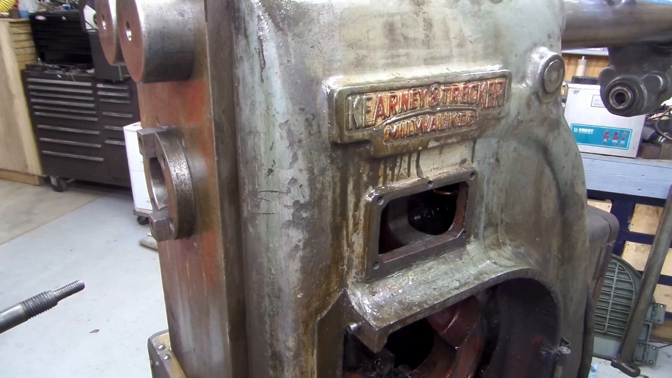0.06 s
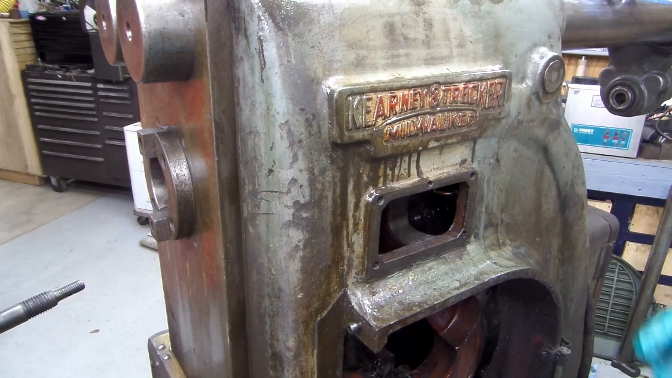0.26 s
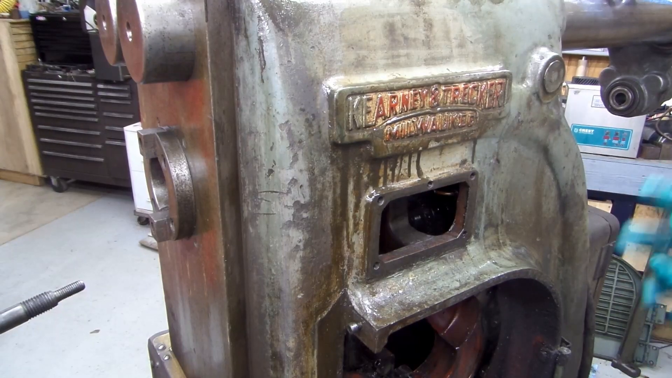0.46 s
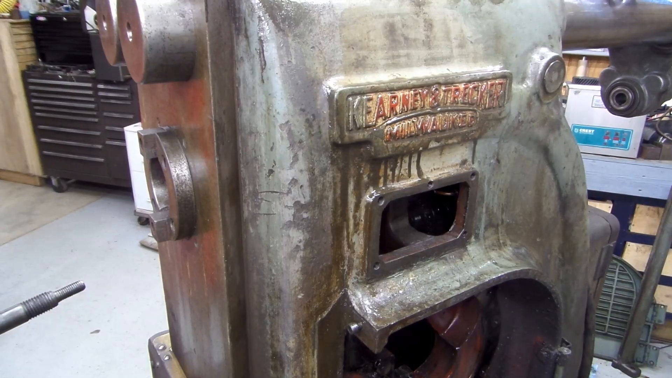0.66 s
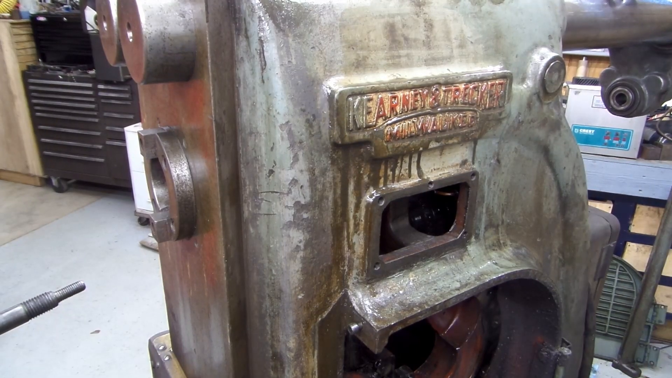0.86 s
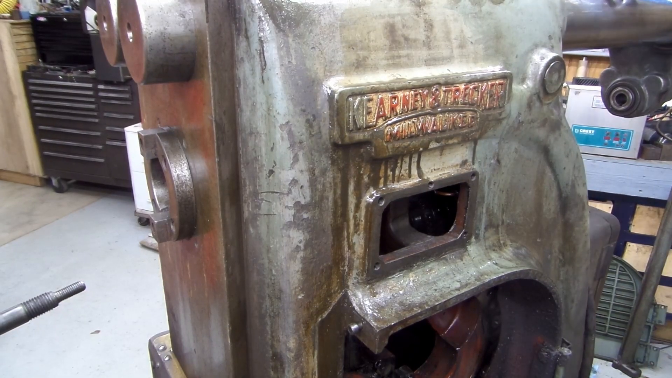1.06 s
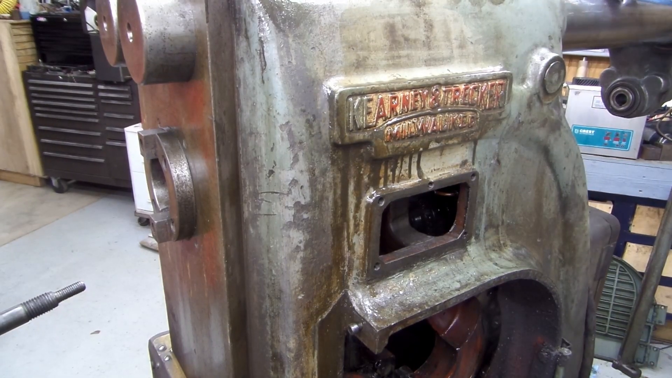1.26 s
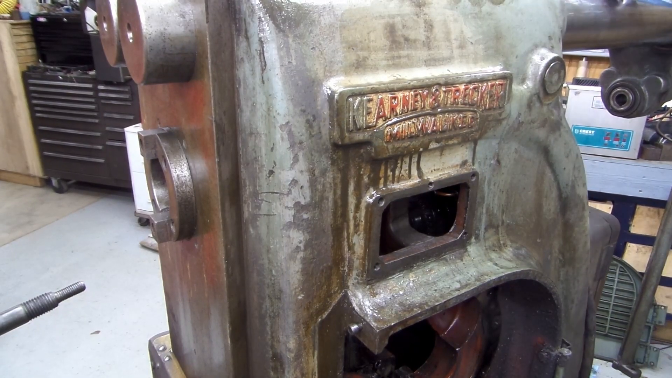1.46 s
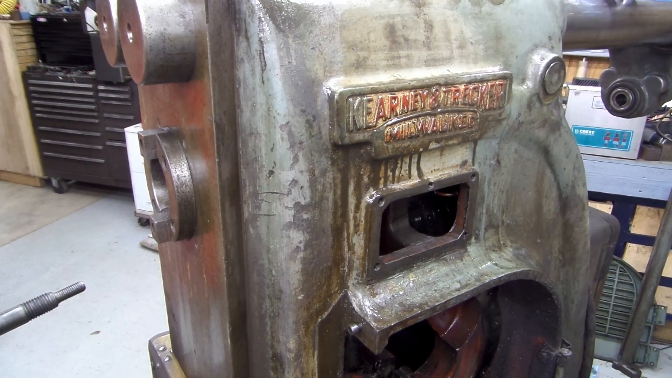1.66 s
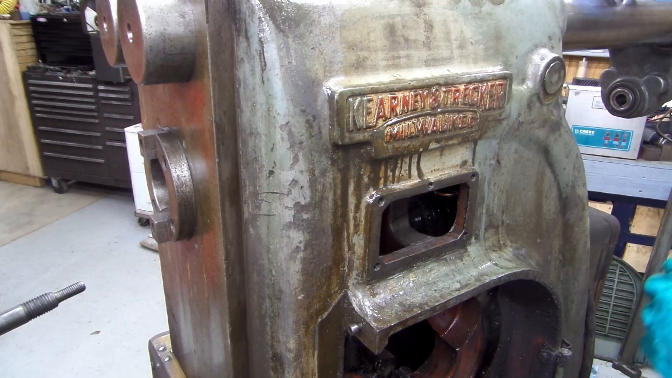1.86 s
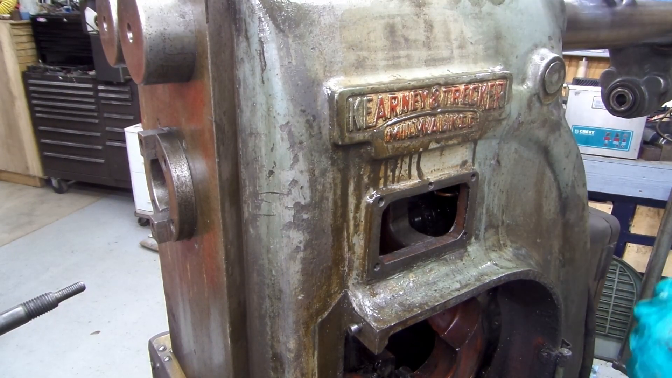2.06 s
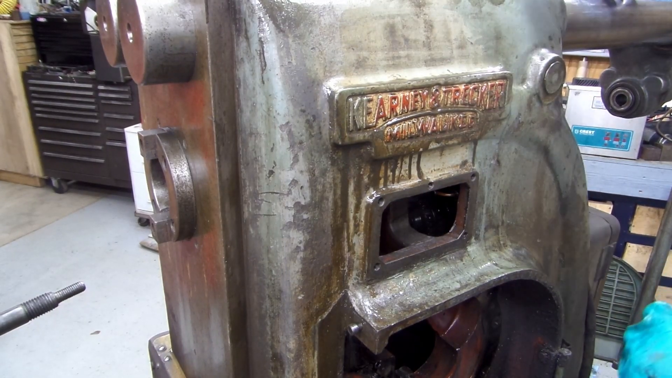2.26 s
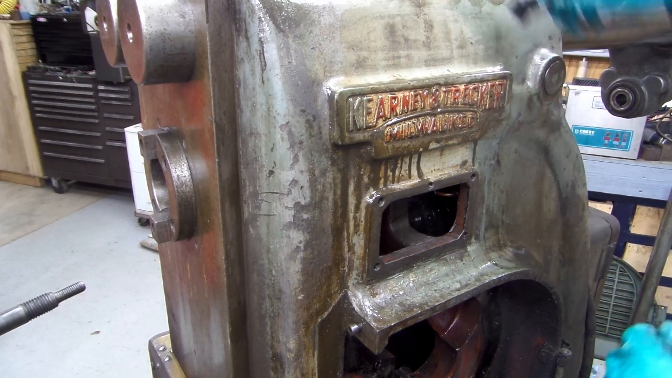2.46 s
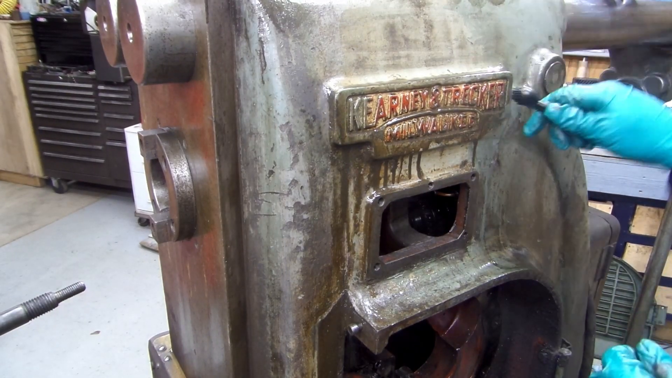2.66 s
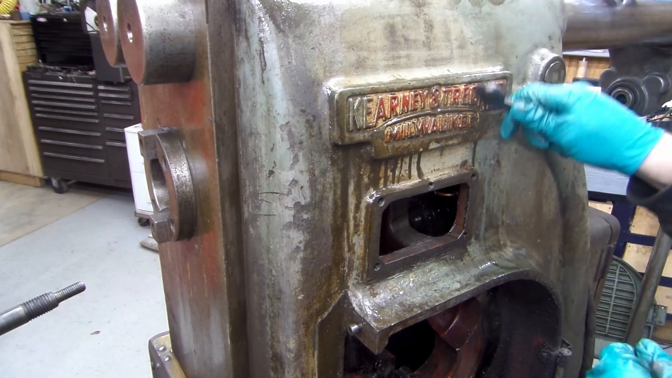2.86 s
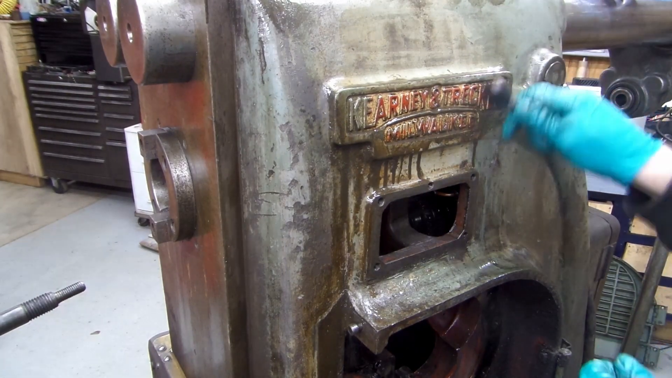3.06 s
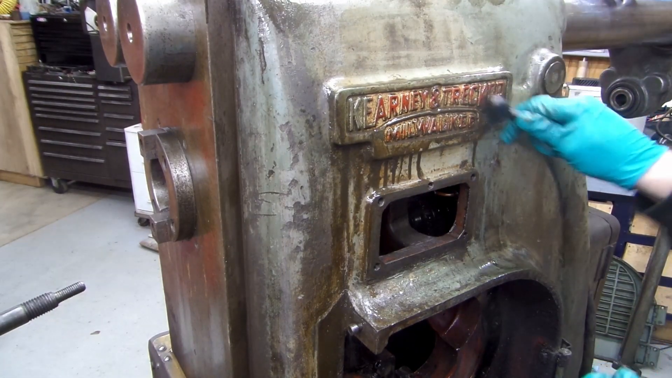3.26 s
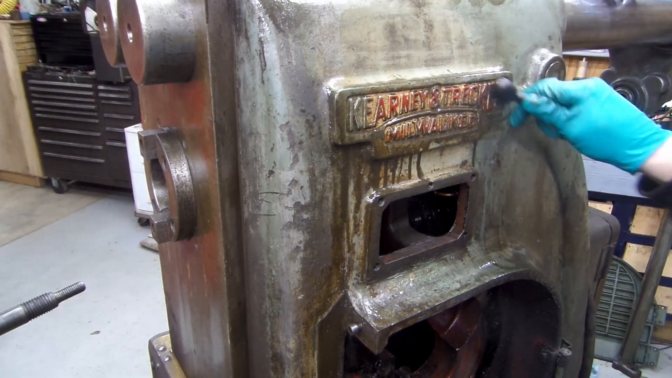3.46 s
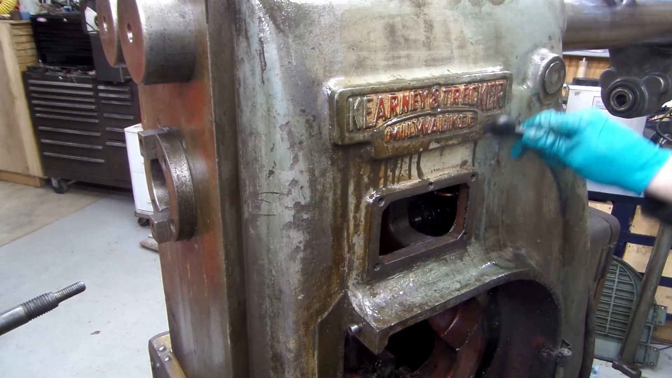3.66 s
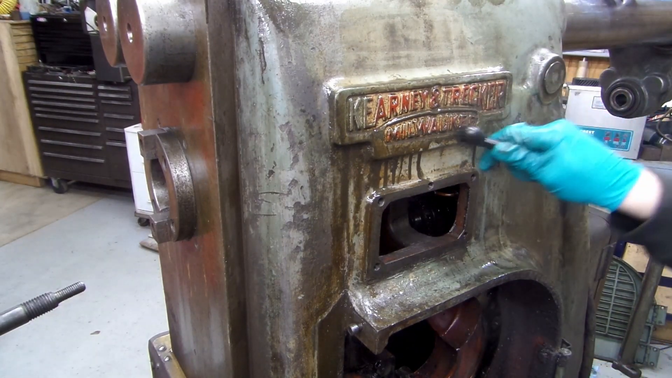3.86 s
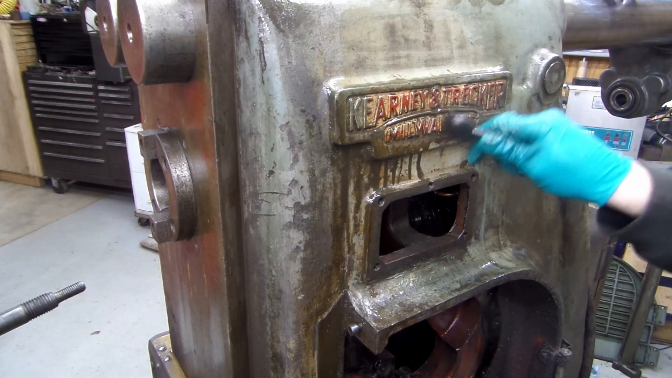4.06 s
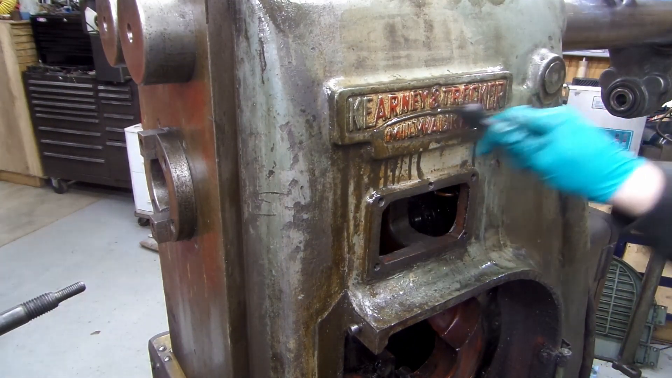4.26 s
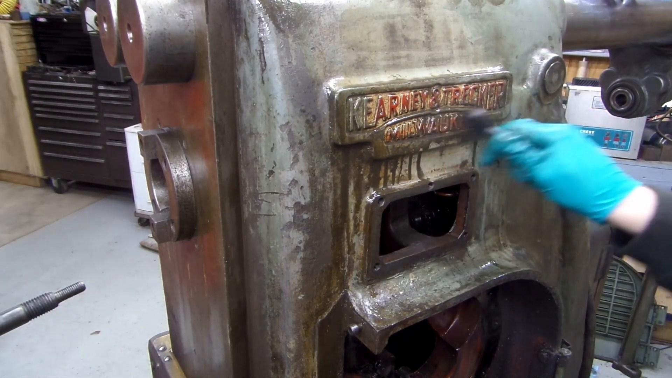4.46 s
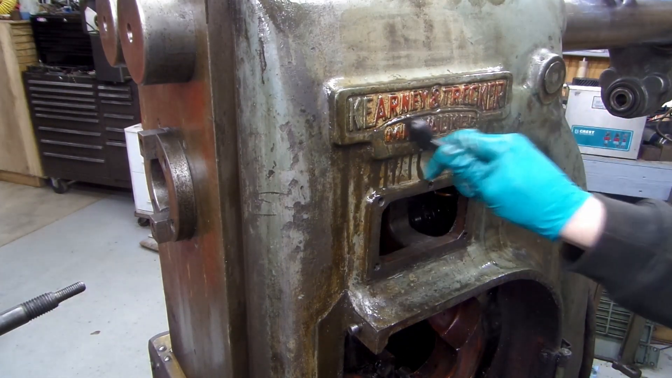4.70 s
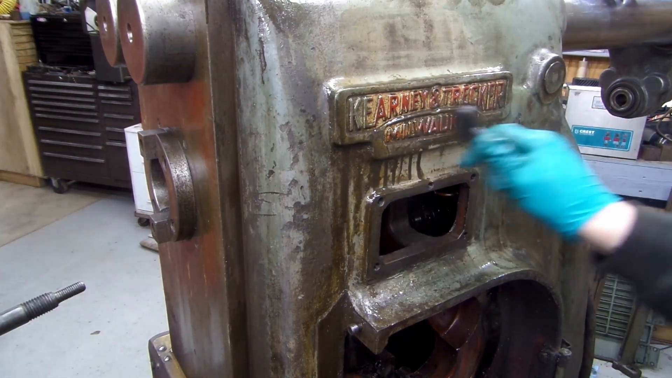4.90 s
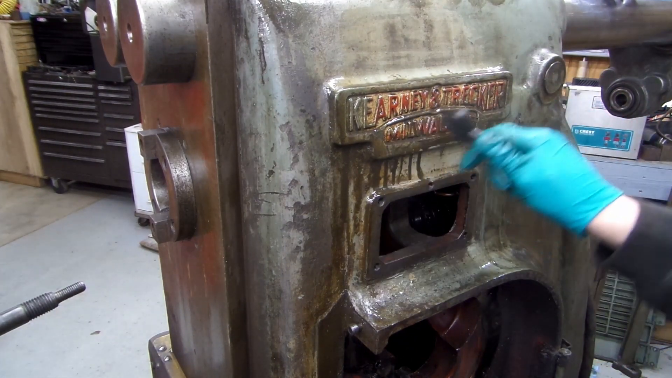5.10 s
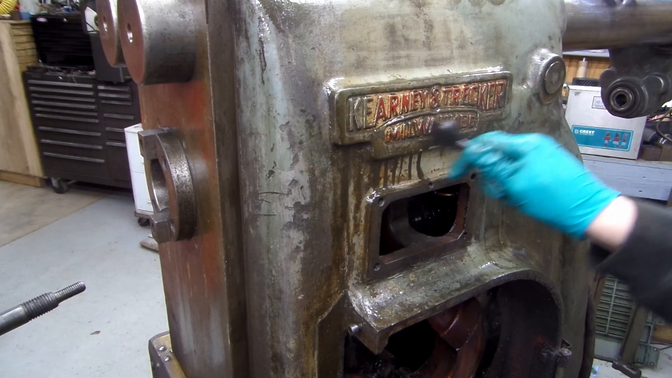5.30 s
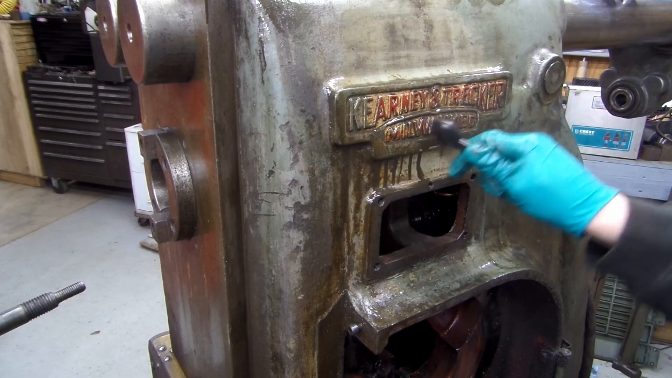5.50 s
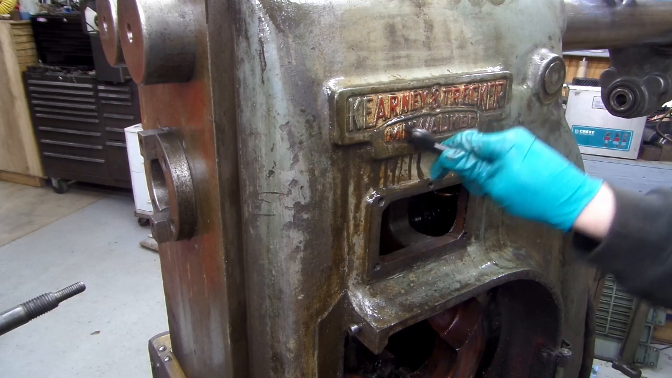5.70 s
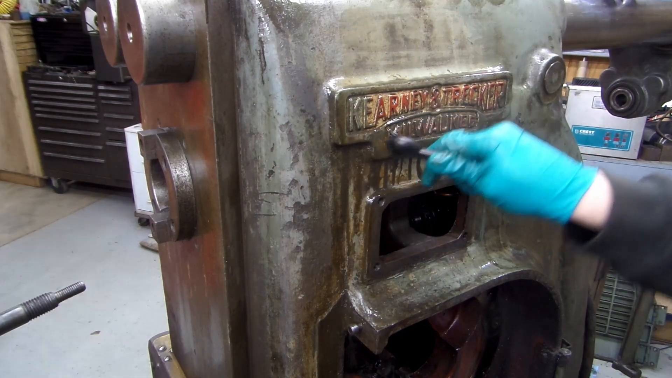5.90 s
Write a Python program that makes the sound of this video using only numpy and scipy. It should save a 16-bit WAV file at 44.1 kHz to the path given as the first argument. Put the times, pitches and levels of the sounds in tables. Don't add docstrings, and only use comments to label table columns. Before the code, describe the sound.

For almost three seconds there is only a thin hiss, low drone and faint brushing, slightly stronger just before one second. Then stiff bristles scrub back and forth on rough metal, about seven or eight strokes a second, crisp and sizzling with tiny snaps. A woody knock interrupts once; later strokes are louder and fuller. Close pickup in a modestly reverberant workshop, lightly lossy.

```python
import sys
import numpy as np
from scipy import signal
from scipy.fft import rfft, irfft, next_fast_len
from scipy.io import wavfile
from scipy.ndimage import uniform_filter1d

SR = 44100
rng = np.random.default_rng(int(sys.argv[2]) if len(sys.argv) > 2 else 0)


def dump_mix(stems):
    frames = np.atleast_2d(stems).T
    limited = np.clip(frames, -1, 1)
    pcm = np.round(limited * 32767).astype(np.int16)
    wavfile.write(sys.argv[1], SR, pcm)


def invert_db(x):
    u = np.asarray(x, float) / 20
    return 10 ** u


N = 261807

# frequency in Hz, density in dB per Hz.
RUMBLE_SPECTRUM = [(59, -38), (100, -5.5), (150, -5), (348, -4.5), (679, -3.5), (735, -3), (1200, -7.5),
                   (1500, -6.5), (1950, -35), (3300, -120)]
# frequency in Hz, density in dB per Hz.
DRONE_SPECTRUM = [(15, -32), (25, -8), (32, -20), (65, -6), (110, -10.5), (140, -61), (240, -120)]
# frequency in Hz, density in dB per Hz.
AIR_SPECTRUM = [(530, -35), (900, -17.5), (1760, -9), (2080, -10.5), (2800, -15), (15700, -17.5)]
# time in seconds, pitch in Hz, level in dB.
PANEL_HUM = [
    (0.42, 175.5, -97),
    (0.452, 170, -72),
    (0.564, 166.3, -68),
    (0.662, 171.3, -61),
    (0.73, 164.7, -72),
    (0.832, 164, -64.5),
    (0.9, 165.5, -88),
]
# time in seconds, effort in dB below full scrubbing.
HAND_WORK = [(0, -16), (.12, -18), (.4, -11), (.7, -3), (.88, -0.5), (1.15, -14.5), (1.7, -19.5),
             (1.85, -14), (2.18, -14), (2.3, -6.5), (2.6, -14.5), (2.81, -17), (2.88, -4.5), (3.2, 1),
             (3.45, -0.5), (4.04, 0), (4.7, 0.5), (5.94, -1.5)]
# time in seconds, peak in dB, pitch in Hz, cycles in the contact, room level in dB.
BLOWS = [(.0035, -51, 2070, 3.4, -12), (.260, -52, 455, 0.54, 4.5), (0.265, -56.5, 160, .6, -3),
         (3.626, -35, 500, 0.58, 1), (3.6565, -8.5, 618, 0.62, -4.5), (4.228, -44.5, 350, 0.79, 4),
         (4.257, -38, 260, 0.33, -8), (4.881, -34, 386, 0.25, 0), (4.886, -38.5, 168, 0.55, 2),
         (4.914, -50, 193, 1, 0), (5.003, -54, 180, 0.9, -1)]
# delay in seconds, level in dB.
ECHOES = [
    (.0049, -7),
    (.013, -10),
    (.025, -27),
    (.0306, -21),
]
# time in seconds, peak in dB.
TUFT_SNAPS = [(2.952, -22.8), (2.9742, -22.1), (3.0015, -18.4), (3.1328, -19.4), (3.5031, -14.1),
              (3.6065, -11.2), (3.645, -10.9), (4.1134, -14.3), (4.3517, -12.1), (4.3803, -10.3),
              (4.3905, -10.6), (5.0031, -10.2), (5.0309, -10.2), (5.264, -13.8), (5.295, -12.8),
              (5.4159, -15.4), (5.5022, -12.5), (5.6679, -13.6), (5.6904, -10.9), (5.756, -15.6),
              (5.8642, -14.3), (5.8818, -12.5), (5.8977, -12.0), (5.9348, -14.2)]
# time of top speed in seconds, level in dB, rise in seconds, fall in seconds,
# tip brightness in dB.
RUBS = [(.02, -66.5, 0.018, 0.028, -3), (.548, -54.5, 0.011, 0.025, 5), (0.681, -41, 0.038, 0.031, -0.5),
        (.865, -37, 0.041, 0.023, 1), (1.02, -57.5, 0.045, 0.039, -6), (1.31, -71, 0.11, .08, -6),
        (1.487, -68.5, .015, 0.072, -1), (1.806, -59.5, 0.023, 0.028, -0.5), (1.94, -58.5, 0.024, 0.042, 2),
        (2.11, -65.5, 0.2, 0.074, -1), (2.285, -50, 0.042, 0.061, 2), (2.42, -64, 0.035, 0.11, 1),
        (2.662, -54, 0.021, 0.025, 2)]
# time of top speed in seconds, level in dB,
# rise in seconds, fall in seconds, tip brightness in dB.
STROKES = [(2.89, -40.5, 0.028, 0.073, 2.5), (3.005, -40, 0.02, 0.043, 4), (3.09, -41, 0.018, 0.029, 3.5),
           (3.168, -33, .03, 0.036, 2), (3.338, -35.5, 0.03, 0.043, 3), (3.483, -34.5, 0.021, 0.014, 4.5),
           (3.56, -37.5, .04, 0.041, 4), (3.635, -29.5, 0.065, 0.045, 2), (3.81, -36.5, 0.031, 0.049, 1),
           (3.89, -37, 0.061, 0.061, 2), (4.135, -35, 0.056, 0.045, 2), (4.25, -39, 0.025, 0.018, 2.5),
           (4.398, -28, 0.051, 0.034, 1.5), (4.53, -34.5, 0.035, 0.038, 0),
           (4.705, -24, 0.039, 0.032, -1.5), (4.855, -30, 0.034, 0.031, 0), (5.02, -24.5, 0.039, 0.033, -1),
           (5.17, -34, 0.046, 0.035, -0.5), (5.285, -29, 0.032, 0.046, 0), (5.42, -39, 0.051, 0.073, 1.5),
           (5.519, -30.5, 0.025, 0.033, 2), (5.69, -29, 0.023, 0.028, 0), (5.742, -29, 0.024, 0.017, 0),
           (5.885, -30.5, 0.033, 0.15, 1)]
# frequency in Hz, density in dB per Hz.
BRISTLE_SPECTRUM = [(530, -27), (900, -17), (1300, -17.5), (1440, -18.5), (1560, -15), (2160, -13),
                    (3320, -9), (3920, -3.5), (7480, 1), (9060, -7.5), (15700, 0.5)]
# time in seconds, bar over the neighbours in dB.
SPARSE_FRAMES = [(.228, 4.5), (.653, 5), (.781, 5), (.932, 5), (1.209, 4.5), (1.463, 4.5), (1.615, 4),
                 (2.062, 4.5), (2.339, 5), (3.468, 5.5), (3.727, 5), (4.045, 4.5), (5.348, 5.5),
                 (5.455, 3.5), (5.583, 4.5)]
# centre in Hz, width in log pitch, bar raised in dB.
THINNED_REGIONS = [
    (1700, .8, 4),
    (7000, .15, -3),
    (9800, .17, 5),
    (15500, .1, -4),
]

TOP_HZ = 15830


def rms_one(x):
    return x / np.sqrt(np.mean(x ** 2) + 1e-20)


def in_time(rows):
    s, *columns = np.transpose(rows)
    return [np.interp(np.arange(N) / SR, s, column) for column in columns]


def band(x, low_hz, high_hz):
    return signal.sosfilt(signal.butter(3, [low_hz, high_hz], "band", fs=SR, output="sos"), x)


def coloured(x, spectrum):
    size = next_fast_len(N)
    hz = np.maximum(np.arange(size // 2 + 1) * SR / size, 1)
    table_hz, table_db = np.transpose(spectrum)
    shape_db = np.interp(np.log(hz), np.log(table_hz), table_db)
    return rms_one(irfft(rfft(x, size) * invert_db(shape_db) * (hz < TOP_HZ), size)[:N])


def drift(rate_hz):
    r = np.exp(-2 * np.pi * rate_hz / SR)
    return rms_one(signal.lfilter([1], [1, -2 * r, r * r], rng.standard_normal(N + SR))[SR:])


def clicks(per_s, spread_db):
    sizes = invert_db(spread_db * np.minimum(rng.exponential(1, N), 3.5))
    signs = rng.choice([-1, 1], N)
    return rms_one(sizes * signs * (rng.random(N) < per_s / SR))


def shop(x):
    t60_s, wall_cut_hz, build_up_s = 0.39, 3000, 0.014
    t = np.arange(SR // 2) / SR
    noise = rng.standard_normal(len(t))
    dull = signal.lfilter(*signal.butter(1, wall_cut_hz, fs=SR), noise)
    decay = invert_db(-60 * t / t60_s)
    tail = (dull + (noise - dull) * decay) * decay * np.minimum(t / build_up_s, 1)
    return signal.fftconvolve(x, tail / np.linalg.norm(tail))[:N]


def rumble():
    work_db, = in_time(HAND_WORK)
    level_db = -53.5 + 0.84 * work_db + 1.2 * drift(13)
    return invert_db(level_db) * coloured(rng.standard_normal(N), RUMBLE_SPECTRUM)


def drone():
    work_db, = in_time(HAND_WORK)
    return invert_db(-65.5 + 0.63 * work_db) * coloured(rng.standard_normal(N), DRONE_SPECTRUM)


def air_hiss():
    return invert_db(-67.5) * coloured(rng.standard_normal(N), AIR_SPECTRUM)


def panel_hum():
    hz, db = in_time(PANEL_HUM)
    t = np.arange(N) / SR
    start_s, end_s = PANEL_HUM[0][0], PANEL_HUM[-1][0]
    gate = np.clip(np.minimum(t - start_s, end_s - t) / 0.03, 0, 1)
    return np.sqrt(2) * gate * invert_db(db) * np.sin(2 * np.pi * np.cumsum(hz) / SR)


def blows():
    direct, wet = np.zeros(N + SR), np.zeros(N + SR)
    t = np.arange(-SR // 50, SR // 50) / SR
    for s, db, hz, cycles, room_db in BLOWS:
        pulse, boom, crack = (invert_db(db) * np.cos(2 * np.pi * f * t) * np.exp(-(f * t / cycles) ** 2)
                              for f in (hz, 0.5 * hz, 3.0 * hz))
        at = round(s * SR)
        for delay_s, echo_db in [(0.00026, 0)] + ECHOES:
            direct[at + round(delay_s * SR):][:len(t)] += invert_db(echo_db) * pulse
        wet[at:at + len(t)] += invert_db(room_db) * (pulse + invert_db(-9.5) * boom + invert_db(-4) * crack)
    early = len(t) // 2
    return direct[early:early + N] + band(shop(wet[early:early + N]), 112.4, 2800)


def tuft_snaps():
    t = np.arange(SR // 200) / SR
    bursts = band(rng.standard_normal((len(TUFT_SNAPS), len(t))) * invert_db(-60 * t / 0.004), 5500, 15000)
    out = np.zeros(N + len(t))
    for (s, db), burst in zip(TUFT_SNAPS, bursts):
        out[round(s * SR):][:len(t)] += invert_db(db - 3.0) * burst / np.abs(burst).max()
    return out[:N]


def stroke_levels():
    top_shape = 1.71
    tips_lead_s = 0.0021
    step = 64
    s, db, rise_s, fall_s, tips_db = np.transpose(RUBS + STROKES)[:, :, None]
    late_s = np.arange(0, N + step, step) / SR - s
    distance = np.abs(late_s / np.where(late_s < 0, rise_s, fall_s))
    power = invert_db(2 * db - 13.4 * distance ** top_shape)
    work_db, = in_time(HAND_WORK)
    drag = invert_db(2 * (-47 + 1.97 * work_db))

    def level_db(powers, lead_s):
        points = (np.arange(N) + lead_s * SR) / step
        return 10 * np.log10(np.interp(points, np.arange(late_s.shape[1]), powers.sum(axis=0)) + drag)

    return level_db(power, 0), level_db(power * invert_db(2 * tips_db), tips_lead_s)


def brush():
    hiss_db, tips_db = stroke_levels()
    swing_db = hiss_db + 40
    rasp_db = -48 + 0.67 * swing_db
    scour_db = -44.5 + 0.9 * swing_db
    sizzle_db = tips_db
    clumps = invert_db(1.26 * drift(150) + 0.49 * drift(30))
    small_snaps = invert_db(-13.5) * clicks(270, 3.4)
    tips, others = (coloured(clumps * clicks(12000, 3) + small_snaps, BRISTLE_SPECTRUM) for _ in range(2))
    rasp = invert_db(rasp_db + 0.93 * drift(12)) * rms_one(band(others, 1110, 3013))
    scour = invert_db(scour_db + 0.68 * drift(15)) * rms_one(band(tips, 3000, 5307))
    hiss = invert_db(hiss_db) * rms_one(band(tips, 5175, 8600))
    sizzle = invert_db(sizzle_db + 1.35 * drift(15)) * rms_one(band(others, 8100, 18500))
    return rasp + scour + hiss + sizzle + tuft_snaps()


def scene():
    background = rumble() + drone() + air_hiss() + panel_hum()
    bristles = brush()
    return (bristles + invert_db(-11) * shop(bristles) + blows() + background)[None]


def thin_lines(x):
    hop_s, start_s = 1024 / 48000, 0.0147
    hop = round(hop_s * SR)
    window = np.sin(np.pi * (np.arange(2 * hop) + 0.5) / (2 * hop))
    centres_s = np.arange(start_s, N / SR, hop_s)
    index = np.round(centres_s * SR).astype(int)[:, None] + np.arange(2 * hop)
    padded = np.pad(x[0], (hop, 2 * hop))
    lines = rfft(padded[index] * window)
    power = np.abs(lines) ** 2
    hz = np.arange(hop + 1) * SR / (2 * hop)

    luck = rng.standard_normal((len(centres_s), hop // 4 + 1))
    luck = rms_one(uniform_filter1d(luck, size=4, axis=0))
    luck = luck.repeat(4, axis=1)[:, :hop + 1]
    raised_db = sum(db * np.exp(-(np.log(hz / centre_hz + 1e-9) / width) ** 2)
                    for centre_hz, width, db in THINNED_REGIONS)
    bar_db = -11 + 5.5 * luck + raised_db
    near = uniform_filter1d(power, size=25, axis=1)
    lift = np.zeros((len(centres_s), 1))

    s, sparse_db = np.transpose(SPARSE_FRAMES)
    sparse = np.round((s - start_s) / hop_s).astype(int)
    bar_db[sparse] = sparse_db[:, None] + 1.5 * luck[sparse] + 0.4 * raised_db - 0.5
    near[sparse] = uniform_filter1d(power[sparse], size=51, axis=1)
    lift[sparse] = 0.55

    exposed = (hz > 350) | (lift > 0)
    weak = (power < near * invert_db(2 * bar_db)) & exposed
    lost = np.where(weak, 0.92 - 0.15 * lift, -lift)
    lost = np.where(hz > TOP_HZ, 1, lost)
    np.subtract.at(padded, index, window * irfft(lines * lost))
    return padded[None, hop:hop + N]


def top_cut(x):
    return signal.sosfilt(signal.butter(12, 17100, fs=SR, output="sos"), x)


def record(dry):
    mix = thin_lines(dry)
    return top_cut(mix)


dry = scene()
out = record(dry)
dump_mix(out)
```